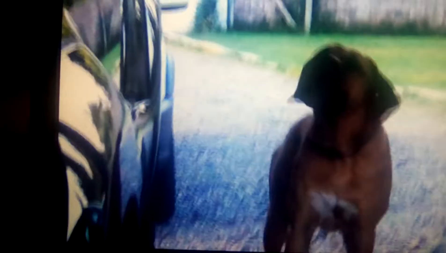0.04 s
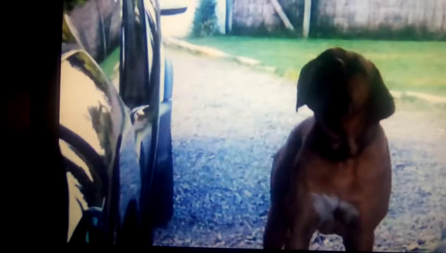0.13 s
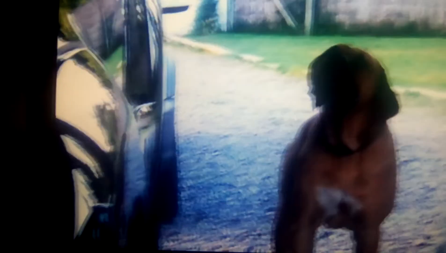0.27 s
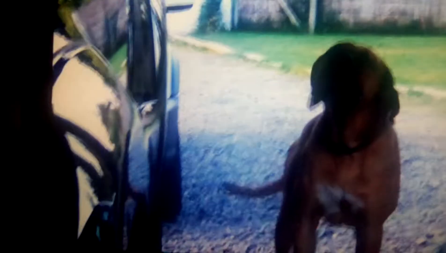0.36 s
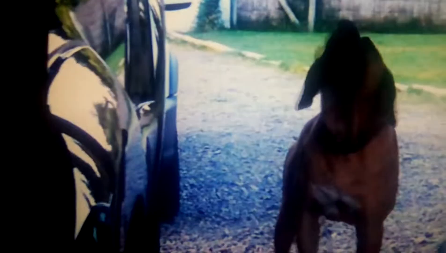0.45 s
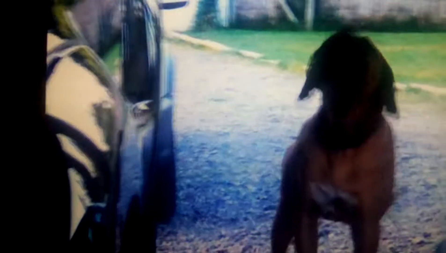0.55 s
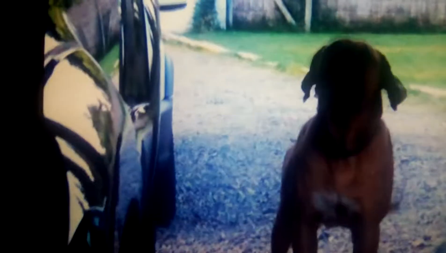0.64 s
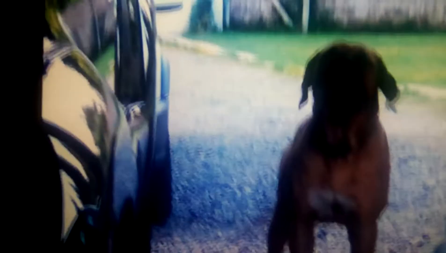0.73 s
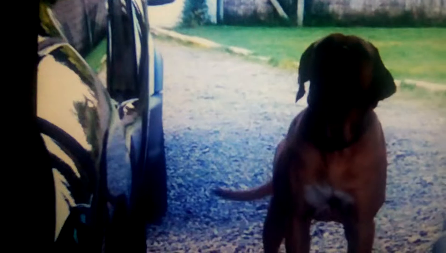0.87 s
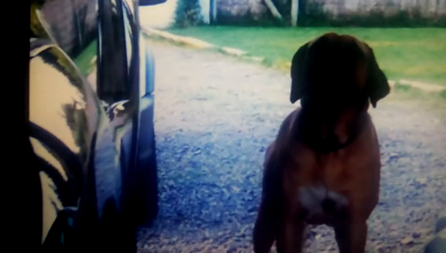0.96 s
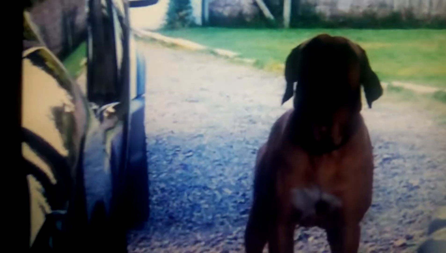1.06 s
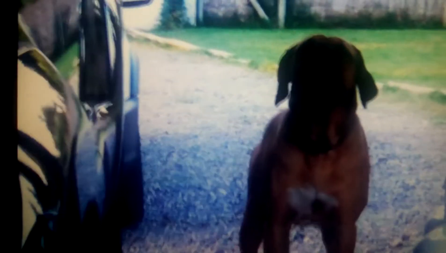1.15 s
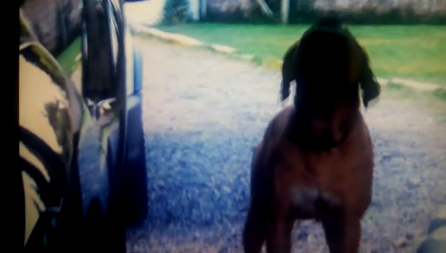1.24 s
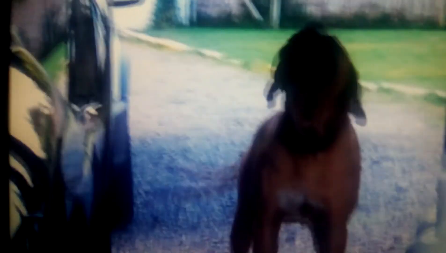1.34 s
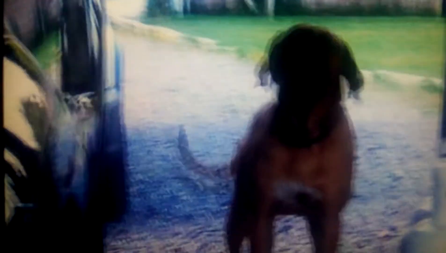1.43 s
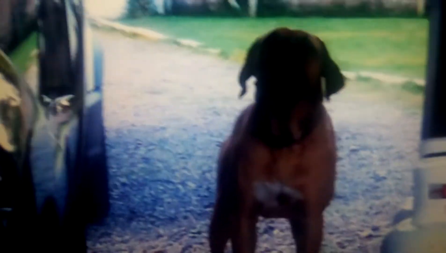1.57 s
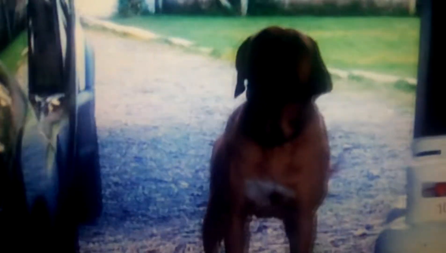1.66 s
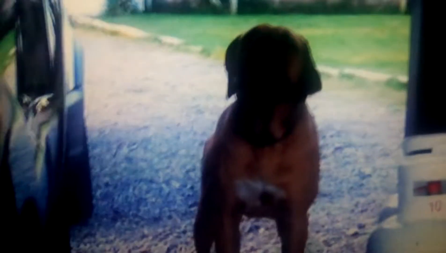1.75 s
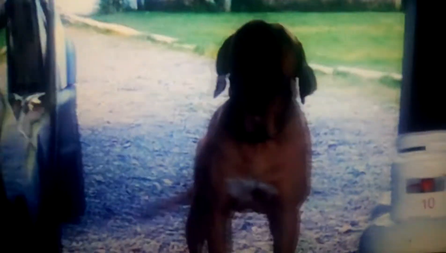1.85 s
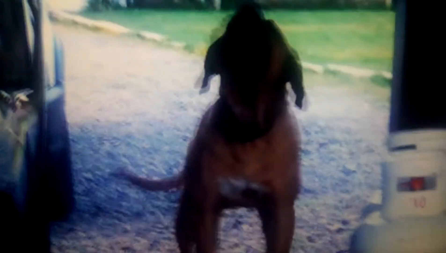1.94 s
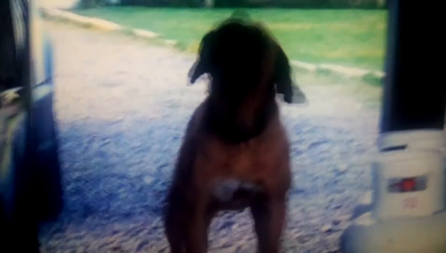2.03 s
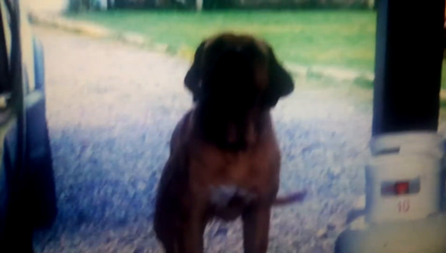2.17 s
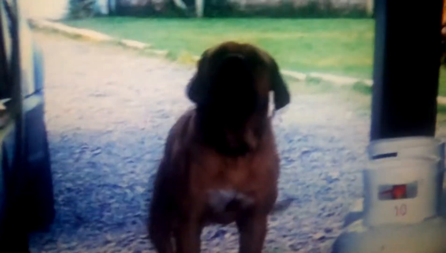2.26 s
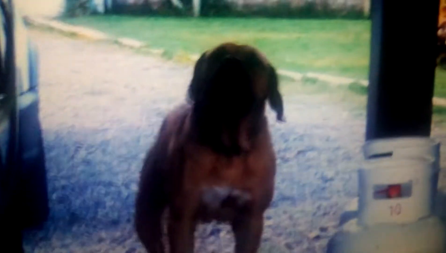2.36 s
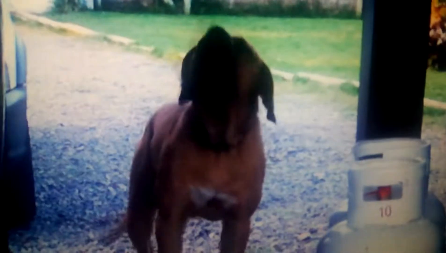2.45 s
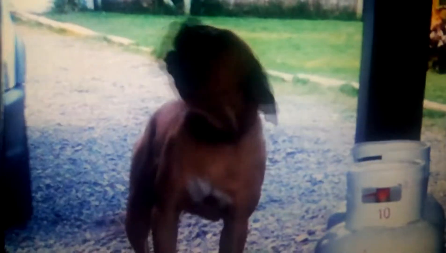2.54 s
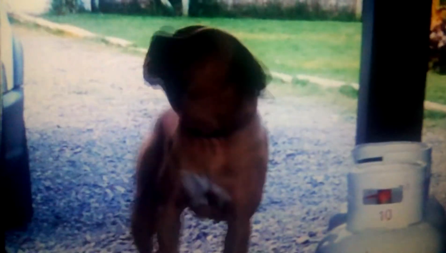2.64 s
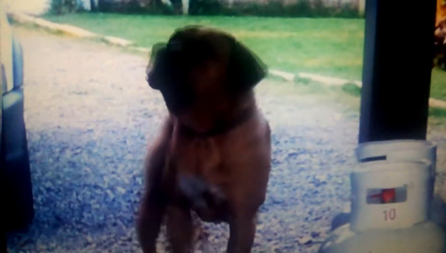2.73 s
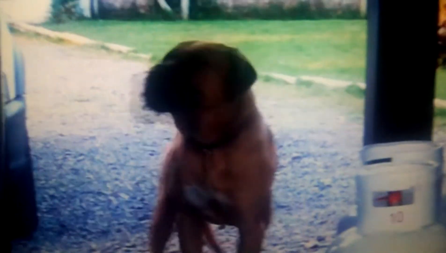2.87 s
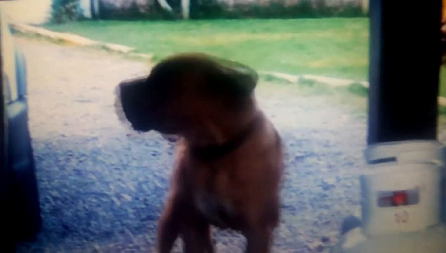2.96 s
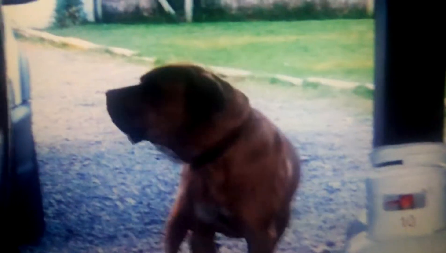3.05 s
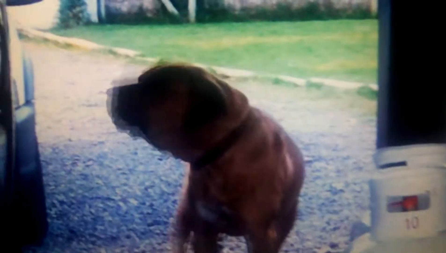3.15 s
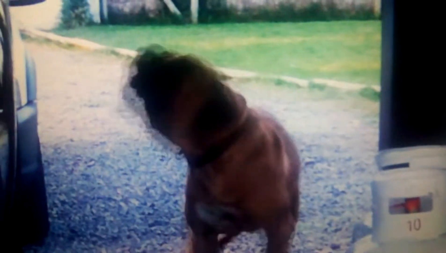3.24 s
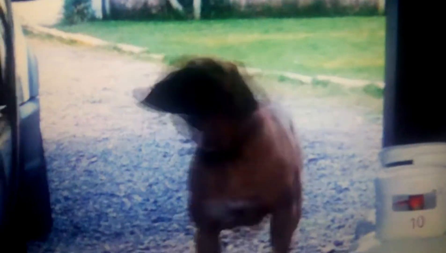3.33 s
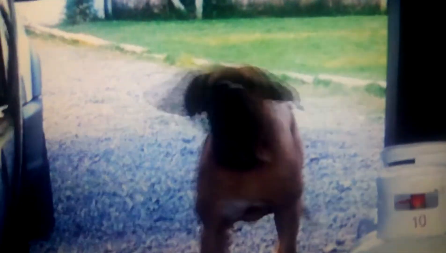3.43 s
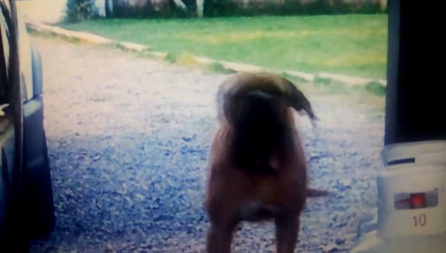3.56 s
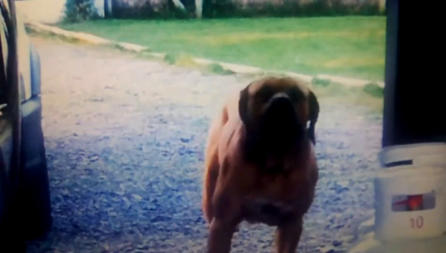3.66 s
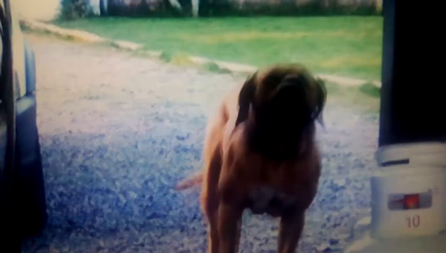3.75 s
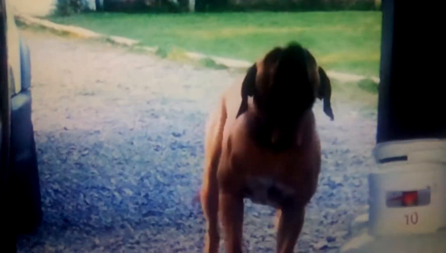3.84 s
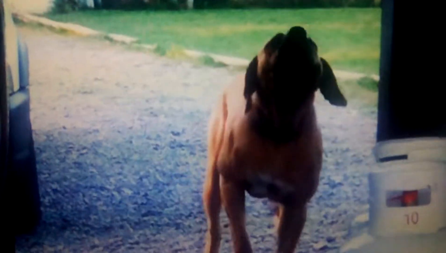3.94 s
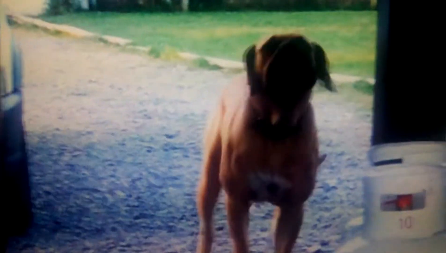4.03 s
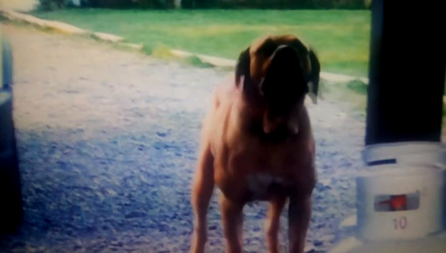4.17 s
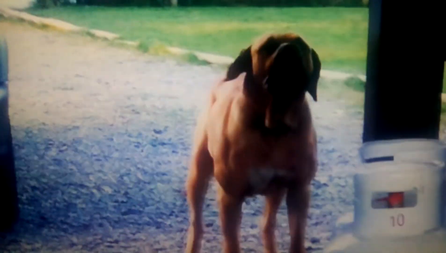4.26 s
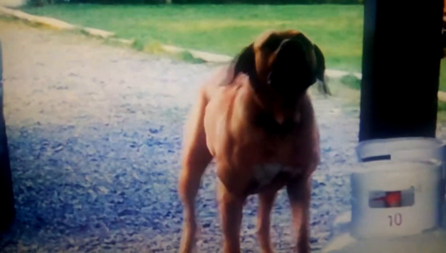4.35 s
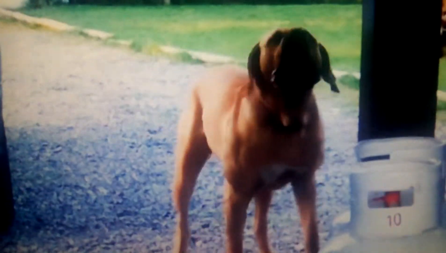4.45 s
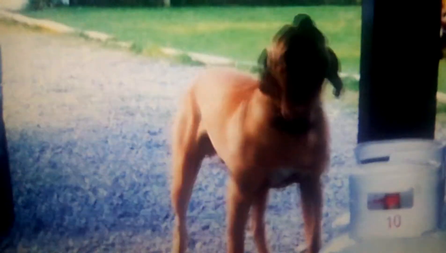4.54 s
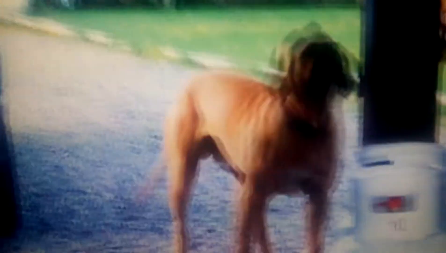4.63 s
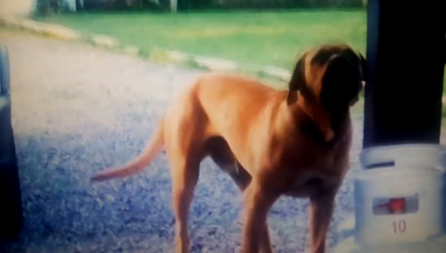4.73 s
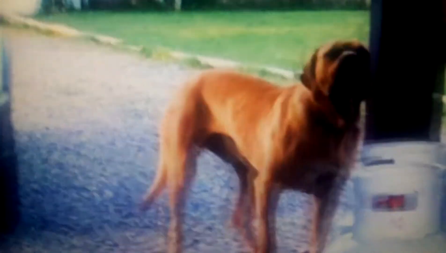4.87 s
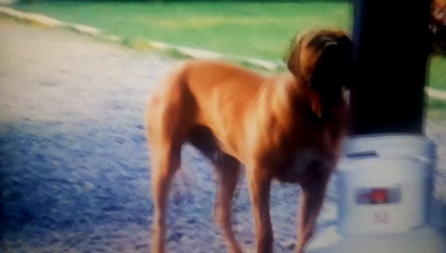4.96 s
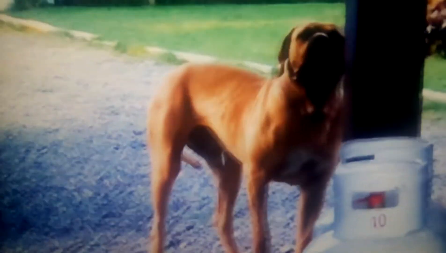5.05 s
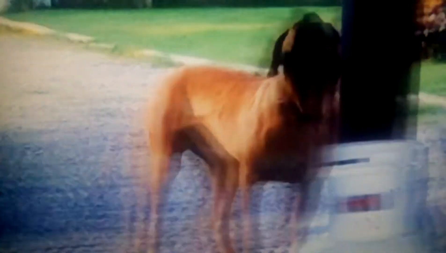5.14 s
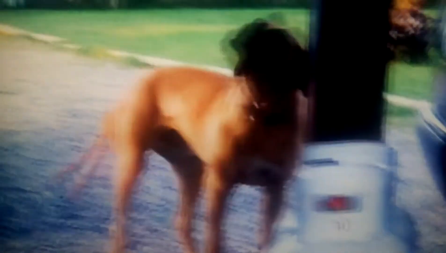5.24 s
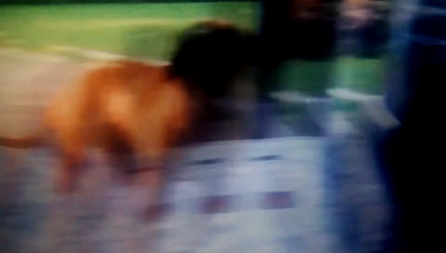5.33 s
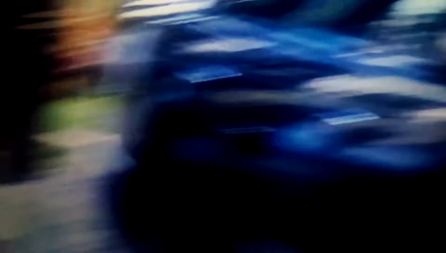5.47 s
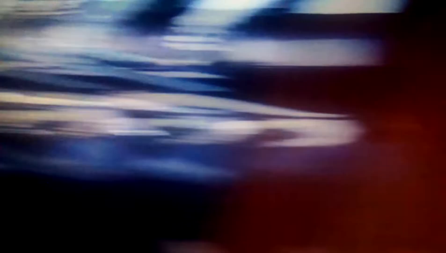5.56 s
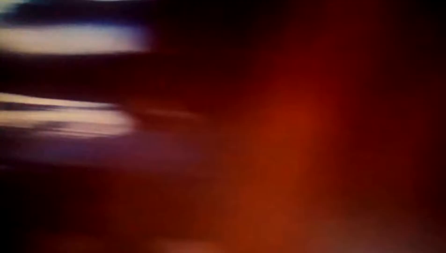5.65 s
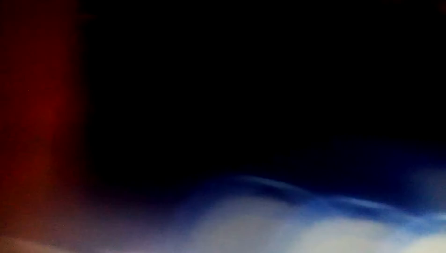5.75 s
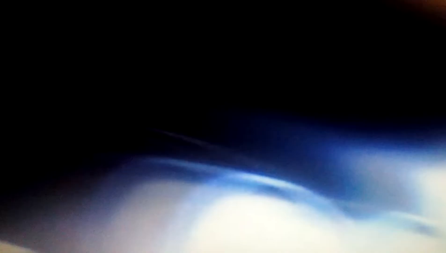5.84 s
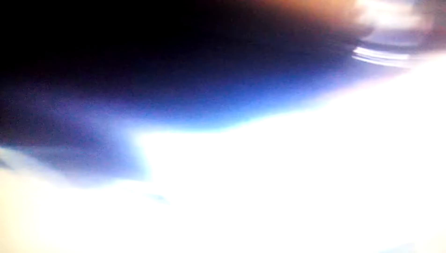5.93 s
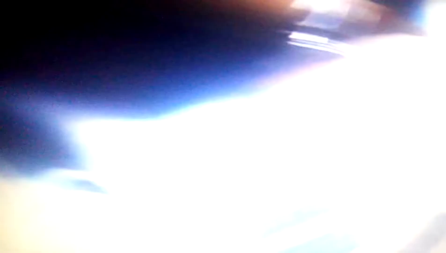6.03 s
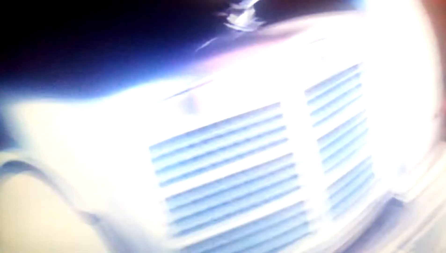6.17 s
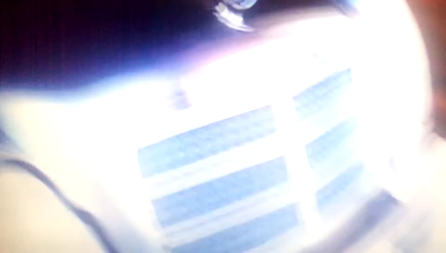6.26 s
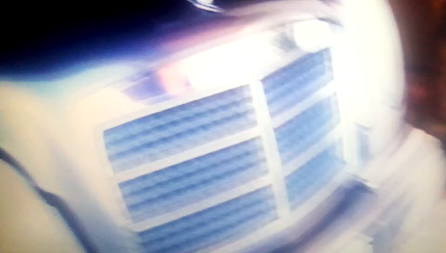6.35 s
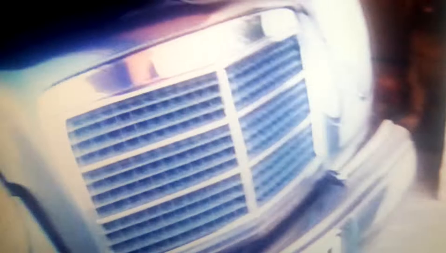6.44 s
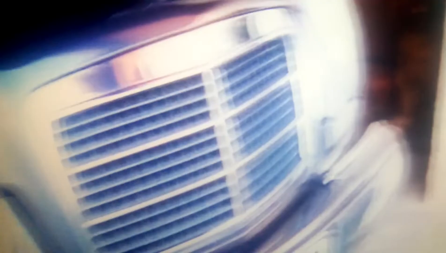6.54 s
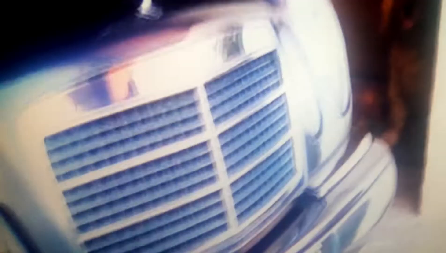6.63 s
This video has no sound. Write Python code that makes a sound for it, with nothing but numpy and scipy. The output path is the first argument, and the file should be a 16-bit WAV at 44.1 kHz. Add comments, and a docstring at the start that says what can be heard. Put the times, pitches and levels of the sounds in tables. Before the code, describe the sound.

A large dog barks nine times on a gravel drive at the mouth of a roofed parking bay. The barks are short, hoarse and evenly paced, growing chestier, with a longer pause before the last. Each rings briefly in the bay. Gravel ticks and scuffs faintly under its paws, and there are two soft knocks and one small electrical pop. A faint hum and hiss lie beneath.

```python
"""Dog barking on a gravel drive.

A large dog barks nine times at a roofed parking bay. Each bark is one push of air, a hoarse arch of
pitch near 380 Hz whose own resonances give way to the ringing of the bay; later ones are chestier.
Gravel ticks and scuffs under its paws. Two soft knocks, one electrical pop; mains hum and hiss beneath."""
import sys
import numpy as np
from scipy import signal
from scipy.fft import rfft, irfft, next_fast_len
from scipy.io import wavfile
from scipy.ndimage import uniform_filter1d, map_coordinates

SR = 44100
rng = np.random.default_rng(int(sys.argv[2]) if len(sys.argv) > 2 else 0)


def bounce(signal):
    """Save signal as a 16-bit WAV file at the path given by the first command-line argument."""
    frames = np.transpose(np.atleast_2d(signal))
    limited = np.clip(frames, -1, 1)
    pcm = np.round(limited * 32767).astype(np.int16)
    wavfile.write(sys.argv[1], SR, pcm)


N = 295313

# Rumble and hiss. Each row: frequency in Hz, relative density in dB.
FLOOR_SPECTRUM = [(20, -46), (38, -15), (52, -1), (75, -2), (100, -1.5), (150, 0.5), (220, -7), (290, -4.5),
                  (500, -8.5), (1000, -15.5), (2000, -19), (5500, -21), (8300, -20), (10000, -23),
                  (15500, -23)]
# Hum lines and one thin electrical whine. Each: frequency in Hz, rms level in dB.
HUM_LINES = [(59.8, -61.5), (120, -68.5), (161.7, -63), (179.7, -62.5), (296.5, -67.5)]
WHINE_LINE = (12898, -87)
# Voltage jump: start in seconds, width in seconds, level in dB.
POP_PULSE = (5.9255, 0.000385, -24)
# Soft knocks. Each row: start in seconds, level in dB, t60 in seconds.
SOFT_KNOCKS = [(1.108, -50.5, .03), (6.545, -46, 0.22)]
# Stones snapping together. Each row: start in seconds, level in dB, ring in Hz, t60 in seconds.
STONE_TICKS = [(1.088, -37, 8850, 0.0033), (1.092, -23.5, 8440, 0.0042), (2.79, -47.5, 8340, 0.031),
               (2.842, -44, 8030, 0.035), (2.984, -36, 2020, 0.0034)]
# Paws sliding. Each row: centre in seconds, half length in seconds, level in dB.
PAW_SCUFFS = [(2.856, .04, -62), (3.698, 0.037, -62.5), (3.82, 0.069, -58), (4.982, 0.046, -58)]
# Knock and gravel noise. Each row: frequency in Hz, relative level in dB.
KNOCK_SPECTRUM = [(150, -12), (480, 13.5), (800, -15), (1400, 5), (2200, -16), (3400, -3), (8000, -39),
                  (15000, -45)]
GRAVEL_SPECTRUM = [(3000, -34), (6000, -17), (8200, -2), (10000, -20), (15000, -22)]
# Near surfaces. Each row: delay in seconds, signed gain.
REFLECTIONS = [(.0027, -0.26), (.0061, -0.14), (0.0102, .22), (0.0179, 0.25)]
# Parking bay decay. Each row: frequency in Hz, t60 in seconds.
BAY_T60 = [(200, 0.41), (700, 0.4), (1100, 0.47), (2000, 0.41), (8000, 0.35), (14000, 0.06)]
# Bark bands, low to high; the narrow peaks in the lower two are the bay ringing.
# Each row: frequency in Hz, relative gain in dB.
CHEST_BAND = [(200, -74), (290, -25), (345, -6.5), (390, 8.5), (422, 5.5), (455, -7.5), (485, -0.5),
              (530, -14), (580, -8), (700, -66)]
MOUTH_BAND = [(480, -25), (630, -28), (678, 11), (728, -1.5), (778, 0.5), (835, -18.5), (885, 0),
              (950, -25), (1200, -57.5)]
SNARL_BAND = [(800, -37), (1000, -3.5), (1100, -0.5), (1190, -0.5), (1270, -3.5), (1350, -3), (1480, -11),
              (1620, -7), (1780, -7.5), (1910, -4), (2040, -21), (2500, -35)]
RASP_BAND = [(1700, -37), (2150, -1.5), (2420, 2), (2750, 2.5), (3300, 3.5), (4200, -4.5), (5000, -7),
             (6700, -1.5), (8250, -1.5), (9000, -13), (10200, -19.5), (12000, -26), (15000, -60)]
# Sharp resonances: boost in dB of throat, mouth, muzzle, lips, teeth.
RING_BOOSTS_DB = (7.2, 9.2, 10.2, 10.5, 9.7)
# Barks. Each row: start, swell, hold and length in seconds; top pitch in Hz; roughness from 0 to 1;
# base fade of the push and fade of the mouth in dB/s; chest boom in dB; relative chest, mouth, snarl and
# rasp levels in dB; treble shelf in dB; sharp resonances of throat, mouth, muzzle, lips, teeth in Hz.
DOG_BARKS = [ (0.439, 0.04, 0.0052, 0.15, 398.4, 0.45, 88, 162, -4, -36.5, -27.5, -41, -49.5, -.5, 332, 770, 1290, 2390, 6770),
             (1.228, 0.03, 0.01, .14, 397.2, 0.46, 101, 35, -17, -34, -31, -37, -44.5, -2.5, 332, 720, 1160, 2560, 8350),
             (1.884, 0.042, .008, 0.17, 400.4, 0.47, 118, 140, -1, -32.5, -30.5, -37, -47, 1.5, 330, 794, 1150, 2760, 8160),
             (2.456, 0.047, 0.039, 0.13, 396.2, 0.41, 32, 51, -11, -36, -33, -42.5, -52.5, 1.5, 343, 770, 1585, 4080, 6740),
             (3.211, 0.042, 0.029, .11, 386.7, 0.34, 78, 52, -2, -31.5, -29.5, -35.5, -45.5, -2.5, 373, 708, 1125, 2930, 7150),
             (3.858, 0.054, 0.016, 0.15, 383.4, 0.22, 120, 41, 6, -34.5, -32, -38.5, -46, 1, 358, 715, 1934, 3210, 6100),
             (4.493, .044, 0.0065, 0.14, 388, .24, 111, 77, 8, -27.5, -30.5, -35.5, -44, 0, 377, 726, 1940, 2720, 6405),
             (5.105, 0.055, 0.032, 0.16, 403.9, 0.33, 90, 65, 8, -31, -31.5, -37.5, -44.5, 0, 388, 790, 1415, 3086, 7060),
             (6.299, .036, 0.063, 0.19, 387.5, 0.46, 169, 119, -2, -25, -29, -36.5, -42.5, -1.5, 490, 660, 1970, 3150, 5840),
             ]

OPEN_HZ, OPEN_DB = (670, 790, 1758, 3400), (-1, 4, 7.5, 1)  # open-mouth resonances
BAY_MODES_HZ, BAY_MODES_DB = (426, 688, 1101), (7, 4.5, 10)
HANDOVER_LAG_S, HANDOVER_S = 0.048, 0.013  # crossfade to bay modes: midpoint after peak; time constant
THROAT_HZ, THROAT_DB_PER_DB, THROAT_FROM_DB = 378, 0.68, -31.5  # a loud chest narrows on this pitch
ATTACK_DB_PER_S, RELEASE_DB_PER_S = 1207, 268
PITCH_LAG_S, BOOM_LAG_S, MOUTH_LAG_S, RASP_LAG_S = .021, 0.002, 0.0043, 0.0088
RASP_FLARE_DB, FLARE_HALF_S = 4.5, 0.012
TOP_HZ = 15550


def amp(db):
    """Decibels to gain."""
    return 10 ** (np.asarray(db) / 20)


def along(points, hz):
    """(Hz, value) points read on a log axis."""
    knots_hz, values = np.transpose(points)
    return np.interp(np.log(hz + 1), np.log(knots_hz + 1), values)


def wobble(rate_hz, size):
    """Smooth random curve, rate_hz knots a second."""
    return map_coordinates(rng.standard_normal(size // 8), [np.arange(size) * rate_hz / SR], mode="wrap")


def filtered(x, response):
    """x through a frequency response."""
    size = next_fast_len(len(x) + SR // 8)
    return irfft(rfft(x, size) * response(np.fft.rfftfreq(size, 1 / SR)), size)[:len(x)]


def coloured(x, spectrum):
    """x shaped by a (Hz, dB) spectrum, at rms 1."""
    shaped = filtered(x, lambda hz: amp(along(spectrum, hz)))
    return shaped / np.sqrt(np.mean(shaped ** 2) + 1e-20)


def add(track, start_s, sound):
    """Mix a sound into the track."""
    part = track[round(start_s * SR):][:len(sound)]
    part += sound[:len(part)]


def hum_and_hiss(floor_db=-55.5, waver_db=1.2):
    """Slightly unsteady hum and whine over rumble and hiss."""
    t = np.arange(N) / SR
    hum = np.zeros(N)
    for hz, db in [*HUM_LINES, WHINE_LINE]:
        peak = np.sqrt(2) * amp(db + waver_db * wobble(14, N))
        hum += peak * np.sin(2 * np.pi * hz * t + .5 * wobble(3.15, N))
    return hum + amp(floor_db) * coloured(rng.standard_normal(N), FLOOR_SPECTRUM)


def pop(coupling_hz=110):
    """Brief square jump of voltage; the input coupling swings back after it."""
    start_s, width_s, db = POP_PULSE
    track = np.zeros(N)
    add(track, start_s, amp(db) * np.clip(width_s * SR - np.arange(SR // 100), 0, 1))
    return signal.sosfilt(signal.butter(2, coupling_hz, "highpass", fs=SR, output="sos"), track)


def knocks():
    """Dull, fast-decaying noise bursts."""
    track, t = np.zeros(N), np.arange(SR // 4) / SR
    for start_s, db, t60_s in SOFT_KNOCKS:
        noise = coloured(rng.standard_normal(len(t)), KNOCK_SPECTRUM)
        add(track, start_s, amp(db - 60 * t / t60_s) * noise)
    return track


def gravel():
    """Stones slide under the paws, or snap together with a dry crack and a short ring."""
    scene_t, t = np.arange(N) / SR, np.arange(SR // 16) / SR
    slide = sum(amp(db) * np.exp(-((scene_t - at_s) / half_s) ** 2) for at_s, half_s, db in PAW_SCUFFS)
    track = slide * coloured(rng.standard_normal(N) * amp(3 * wobble(300, N)), GRAVEL_SPECTRUM)
    for start_s, db, ring_hz, t60_s in STONE_TICKS:
        ring = np.sin(2 * np.pi * ring_hz * np.cumsum(1 + 0.1 * wobble(2800, len(t))) / SR)
        envelope = amp(-60 * t / t60_s) * (1 - np.exp(-t / 0.00025))
        crack = amp(-5.5 - 60 * t / .0012) * coloured(rng.standard_normal(len(t)), GRAVEL_SPECTRUM)
        add(track, start_s, amp(db) * (envelope * ring + crack))
    return track


def bay(x, wet_db, build_s=0.0067):
    """Diffuse tail of the bay; each frequency decays at its own rate."""
    hz, t, noise = signal.stft(rng.standard_normal(SR // 2), SR, nperseg=256)
    swell = 1 - np.exp(-t / build_s)
    decay = amp(-60 * t / along(BAY_T60, hz)[:, None])
    tail = signal.istft(noise * swell * decay, SR, nperseg=256)[1]
    return amp(wet_db) * signal.fftconvolve(x, tail / np.linalg.norm(tail))[:len(x)]


def near_surfaces(x):
    """Ground, car and post comb the sound with early copies."""
    return filtered(x, lambda hz: 1 + sum(gain * np.exp(-2j * np.pi * hz * delay_s)
                                          for delay_s, gain in REFLECTIONS))


def treble(shelf_db, ripple_db=3, shelf_hz=4500):
    """Response of a treble shelf with random ripple."""
    knots_hz = np.arange(0, TOP_HZ, 120)
    knots_db = ripple_db * rng.standard_normal(len(knots_hz)) * np.clip(knots_hz / 2000 - .5, 0, 1)
    return lambda hz: amp(np.interp(hz, knots_hz, knots_db)
                          + shelf_db * (1 - 1 / (1 + (hz / shelf_hz) ** 10)))


def peaks(rings_hz, rings_db, base_width_hz=22, widening=0.0053):
    """Response of sharp resonances, the higher the wider."""
    return lambda hz: amp(sum(db * np.exp(-.5 * ((hz - f) / (base_width_hz + widening * f)) ** 2)
                              for f, db in zip(rings_hz, rings_db)))


def push(t, peak_s, hold_s, swell_db, fade_db_per_s):
    """Level in dB of one push of air: swell, hold, fade."""
    rise_db = -swell_db * np.clip(1 - t / peak_s, 0, 1) ** 2
    return rise_db - fade_db_per_s * np.maximum(t - peak_s - hold_s, 0)


def folds(t, top_s, top_hz, scoop=.19, sag=0.12, arch_s=.06, jitter=0.0213, lurch=0.01973,
          shimmer_db=1.5):
    """Vocal fold buzz, its pitch arching with the push, and turbulence chopped once a cycle."""
    arch = 1 - np.where(t < top_s, scoop, sag) * (1 - np.exp(-((t - top_s) / arch_s) ** 2))
    unsteady = 1 + jitter * wobble(261.6, len(t)) + lurch * wobble(69.9, len(t))
    phase = 2 * np.pi * np.cumsum(top_hz * arch * unsteady) / SR
    offsets_rad = rng.uniform(0, 2 * np.pi, 28)
    buzz = sum(np.cos(k * phase + offset) for k, offset in enumerate(offsets_rad, 1))
    air = rng.standard_normal(len(t)) * (1 + 0.2 * np.cos(phase))
    return np.array([buzz, air]) * amp(shimmer_db * wobble(148.0, len(t)))


def bark(t, swell_s, hold_s, length_s, top_hz, rough, fade_db_per_s, mouth_db_per_s, boom_db,
         chest_db, mouth_db, snarl_db, rasp_db, shelf_db, *rings_hz):
    """One push of air starts the folds; they sound in four bands, and the bay answers."""
    throat = peaks([THROAT_HZ], [THROAT_DB_PER_DB * (chest_db - THROAT_FROM_DB)])
    brightness = treble(shelf_db)
    bay_share = .5 + .5 * np.tanh((t - swell_s - HANDOVER_LAG_S) / HANDOVER_S)

    def resonate(x):
        """The bark's own resonances give way to the ringing of the parking bay."""
        x = filtered(x, lambda hz: throat(hz) * brightness(hz))
        own = filtered(x, peaks([*rings_hz, *OPEN_HZ], [*RING_BOOSTS_DB, *OPEN_DB]))
        return (1 - bay_share) * own + bay_share * filtered(x, peaks(BAY_MODES_HZ, BAY_MODES_DB))

    buzz, air = map(resonate, folds(t, swell_s + PITCH_LAG_S, top_hz))

    def layer(band, level_db, air_share, flutter_db, lag_s=0):
        """Buzz and turbulence through one band: levelled, gated, fluttering."""
        air_share = np.clip(air_share, 0, 1)
        voice = np.sqrt(1 - air_share) * coloured(buzz, band) + np.sqrt(air_share) * coloured(air, band)
        rms = np.sqrt(np.abs(uniform_filter1d(voice ** 2, size=900)) + 1e-6)
        attack_db = -ATTACK_DB_PER_S * np.maximum(lag_s - t, 0)
        release_db = -RELEASE_DB_PER_S * np.maximum(t - length_s, 0)
        return voice / rms * amp(level_db + attack_db + release_db + flutter_db * wobble(67.4, len(t)))

    flare = lambda at_s: np.exp(-((t - at_s) / FLARE_HALF_S) ** 2)
    chest_db += push(t, swell_s, hold_s, 15, 1.44 * fade_db_per_s) + boom_db * flare(swell_s + BOOM_LAG_S)
    mouth_db += push(t, swell_s + MOUTH_LAG_S, hold_s, 16, mouth_db_per_s)
    snarl_db += push(t, swell_s, hold_s, 22, fade_db_per_s)
    rasp_db += push(t, swell_s, hold_s, 4.5, 1.23 * fade_db_per_s) + RASP_FLARE_DB * flare(swell_s)
    hoarse = rough * np.clip((t + .012) / .045, 0, 1)  # starts clear, then breaks up
    chest = layer(CHEST_BAND, chest_db, 1.97 * hoarse, flutter_db=1.7)
    mouth = layer(MOUTH_BAND, mouth_db, 0.97 * hoarse, flutter_db=2)
    snarl = layer(SNARL_BAND, snarl_db, 1.23 * hoarse, flutter_db=2.25)
    rasp = layer(RASP_BAND, rasp_db, 2.13 * rough, flutter_db=1.55, lag_s=RASP_LAG_S)
    low, high = chest + mouth, near_surfaces(snarl + rasp)
    return amp(-2.0) * (low + high + bay(low, wet_db=-12.0) + bay(high, wet_db=-8.5))


def dog():
    """The run of nine barks."""
    track = np.zeros(N)
    t = np.arange(-SR // 25, SR * 2 // 3) / SR  # 0 at the start of a bark
    for start_s, *shape in DOG_BARKS:
        add(track, start_s + t[0], bark(t, *shape))
    return track


def scene():
    """Mono mix of all sources."""
    return (dog() + gravel() + knocks() + hum_and_hiss() + pop())[None]


def record(dry):
    """Brick-wall low-pass at TOP_HZ."""
    return np.array([filtered(x, lambda hz: hz < TOP_HZ) for x in dry])


dry = scene()
out = record(dry)
bounce(out)
```